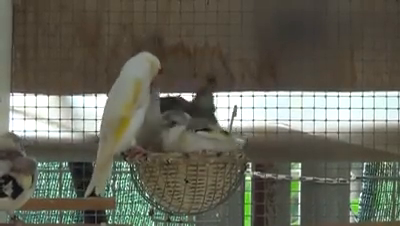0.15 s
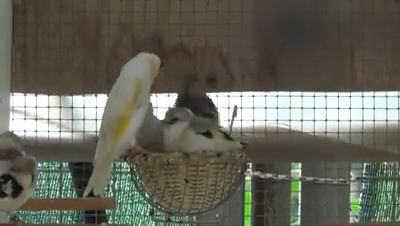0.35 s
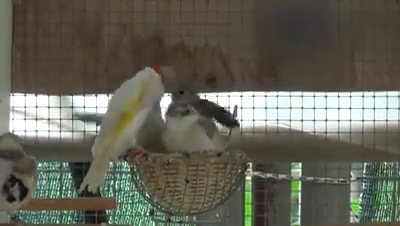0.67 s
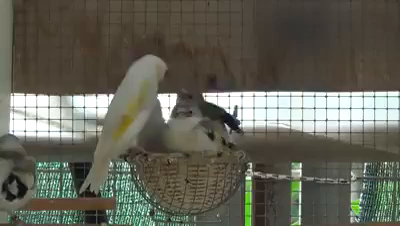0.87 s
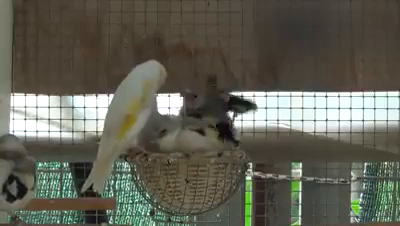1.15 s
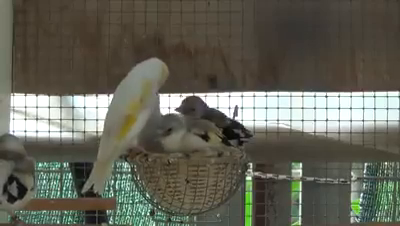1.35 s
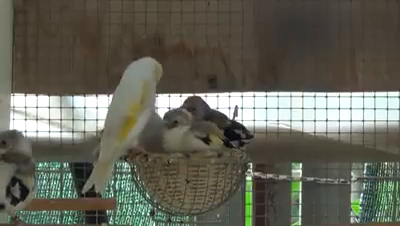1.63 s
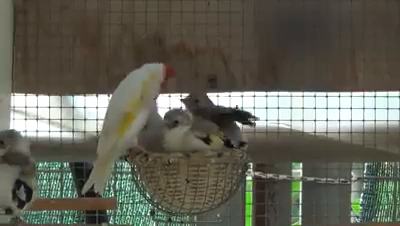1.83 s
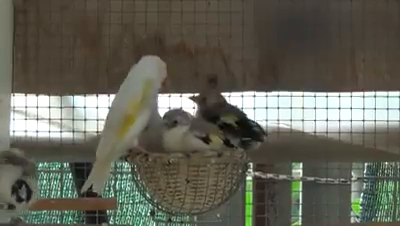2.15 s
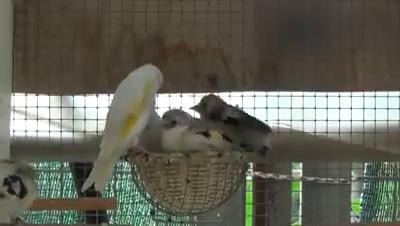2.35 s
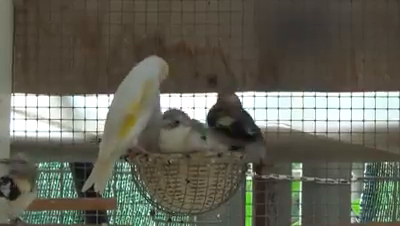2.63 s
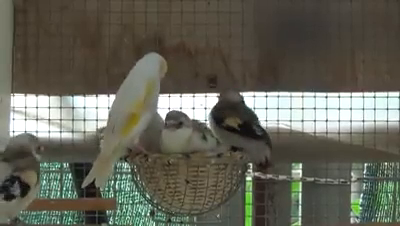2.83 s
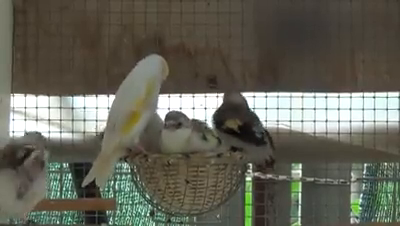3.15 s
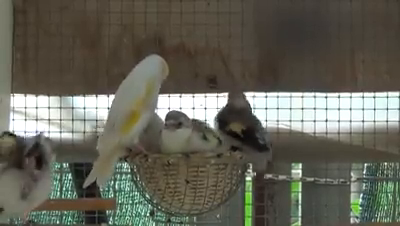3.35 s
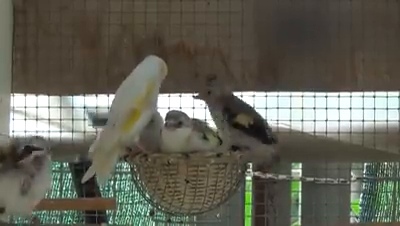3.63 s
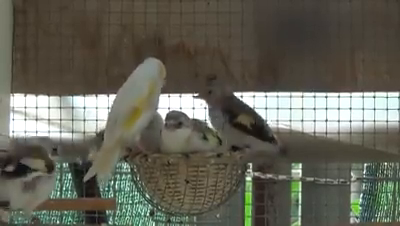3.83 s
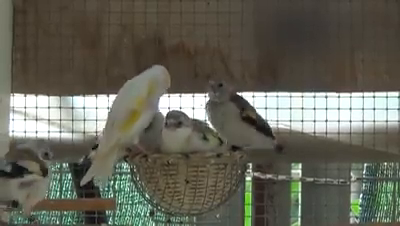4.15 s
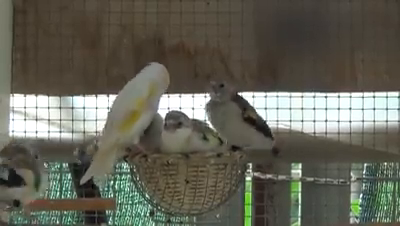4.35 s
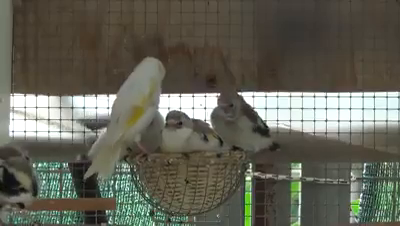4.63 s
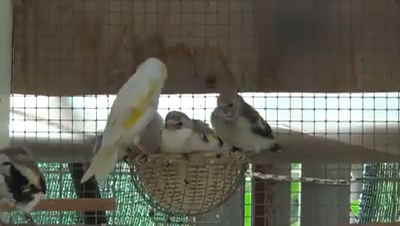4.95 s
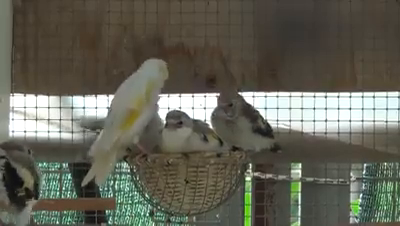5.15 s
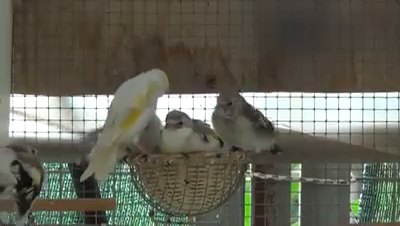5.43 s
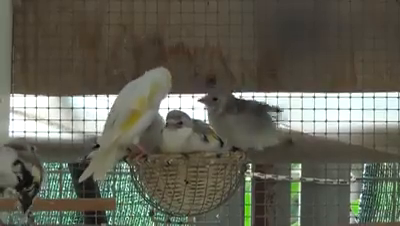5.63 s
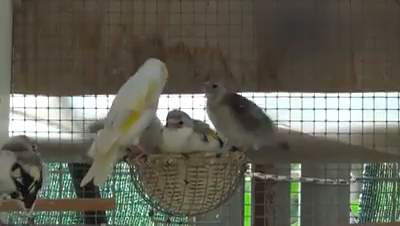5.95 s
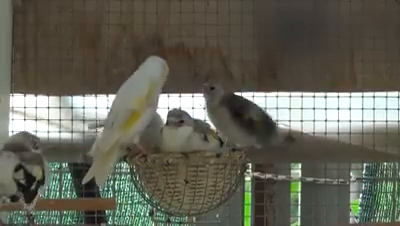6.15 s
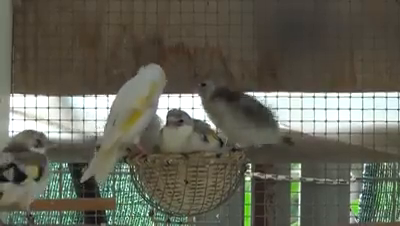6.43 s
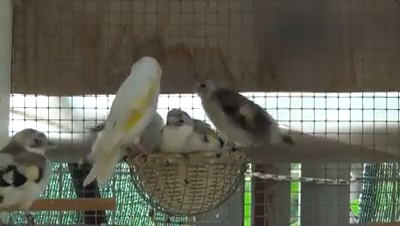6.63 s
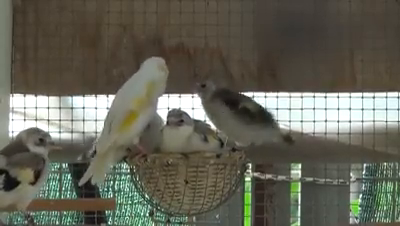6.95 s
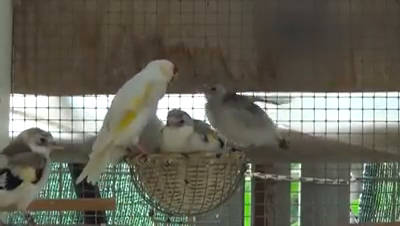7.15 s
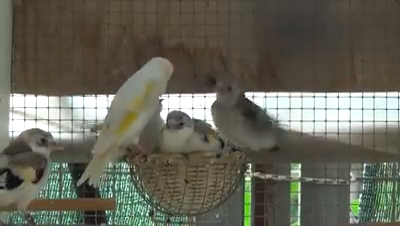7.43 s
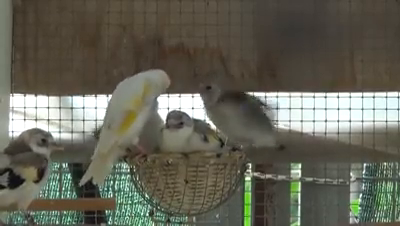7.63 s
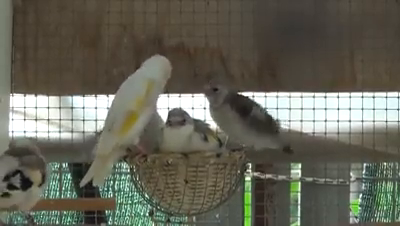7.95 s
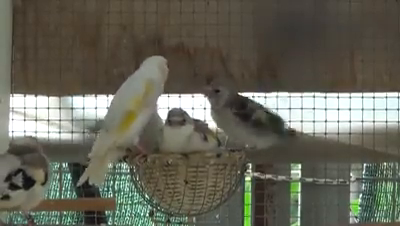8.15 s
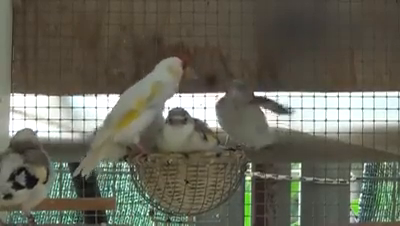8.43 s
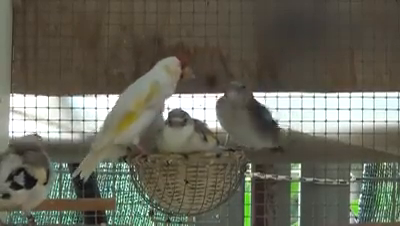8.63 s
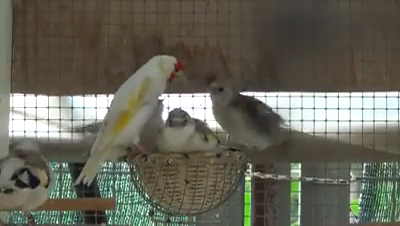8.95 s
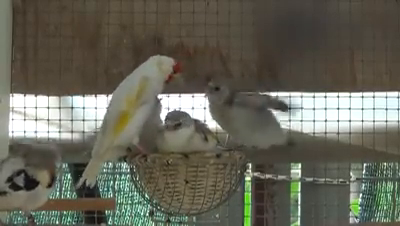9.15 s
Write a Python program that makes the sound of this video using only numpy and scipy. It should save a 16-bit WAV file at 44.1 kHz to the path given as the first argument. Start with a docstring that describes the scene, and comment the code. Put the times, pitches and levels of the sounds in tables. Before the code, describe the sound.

Close, quick finch chirps and harsh fledgling begging bursts over a hissing flock twitter, a steady mid-clip trill, dull wood knocks and faint traffic rumble.

```python
"""A wooden, wire-fronted aviary of finches, over far traffic noise and two wavering motor tones.
Close to the microphone fledglings beg with rasping rising cries and adults chirp: gliding whistles, echoed
by the boards; beak ticks are filtered cracks of noise. A trill of steady tones comes from farther off.
The rest of the flock blurs into a twitter of swelling noise bands, and dull knocks ring the wood's modes."""
import sys
import numpy as np
from scipy import signal
from scipy.fft import rfft, irfft
from scipy.io import wavfile

SR = 44100
rng = np.random.default_rng(int(sys.argv[2]) if len(sys.argv) > 2 else 0)


def output_pcm(signal):
    """Save a mono or channel-first signal as 16-bit PCM at the path in sys.argv[1].

    Samples are clipped to [-1, 1] before scaling.
    """
    pcm = np.clip(np.atleast_2d(signal).T, -1, 1) * 32767
    wavfile.write(sys.argv[1], SR, np.round(pcm).astype(np.int16))


N = 409248  # length of the scene [samples]

# difference between the two microphone ports: (frequency [Hz], side minus mid [dB])
SIDE_LEVEL = [(60, -75), (110, -70), (210, -40), (400, -42.5), (750, -22.5), (1410, -10), (2640, -9.5),
              (4960, -11), (7000, -8.5), (9330, -4)]


def from_db(db):
    """Decibels to gain."""
    return 10 ** (np.asarray(db) / 20)


def rms_one(x):
    """Scale to unit rms."""
    return x / np.sqrt(np.mean(x ** 2) + 1e-20)


def in_time(rows):
    """Columns of a table that starts with time [s], drawn as curves with one value per sample."""
    s, *columns = np.transpose(rows)
    return [np.interp(np.arange(N) / SR, s, column) for column in columns]


def wander(rate_hz):
    """Slow chance: white noise twice through a one-pole low-pass, scaled to a spread of 1."""
    r = np.exp(-2 * np.pi * rate_hz / SR)
    settled = signal.lfilter([1], [1, -2 * r, r * r], rng.standard_normal(N + SR))[SR:]
    return rms_one(settled)


def band_pass(order, edges_hz, x):
    """Keep the band between two edges [Hz]."""
    return signal.sosfilt(signal.butter(order, edges_hz, "band", fs=SR, output="sos"), x)


def coloured(x, spectrum):
    """Shape by a table of (frequency [Hz], gain [dB]), read along log frequency."""
    hz = np.maximum(np.arange(N // 2 + 1) * SR / N, 1)
    table_hz, table_db = np.transpose(spectrum)
    gain = from_db(np.interp(np.log(hz), np.log(table_hz), table_db))
    return irfft(rfft(x) * gain, N)


def spread(mid, other):
    """Two close microphone ports: an unrelated twin of the sound makes the side, stronger in the treble."""
    side = coloured(other, SIDE_LEVEL)
    return np.array([mid + side, mid - side])


def add(out, s, note, pan_db):
    """Place a note at a time [s] and between the ports, left minus right [dB]."""
    i = round(s * SR)
    note = note[:N - i]
    out[:, i:i + len(note)] += note * from_db([[pan_db / 2], [-pan_db / 2]])


def traffic():
    """Far traffic: noise coloured mostly low, its level drifting by chance."""
    # (frequency [Hz], relative level [dB])
    colour = [(12, -38), (20, 3), (43, 0), (180, -1.5), (260, 1.5), (332, -4), (958, -4.5), (1410, -6.5),
              (1880, -11), (2350, -13), (2600, -15.5), (3380, -35), (5720, -120)]
    # (time [s], level [dB])
    level = [(0.0, -38.5), (2.02, -41), (9.28, -41.5)]
    mid, other = rms_one(coloured(rng.standard_normal((2, N)), colour))
    return from_db(in_time(level)[0] + 0.69 * wander(2.5)) * spread(mid, other)


def motor_hum():
    """Two sine tones, alike at both ports, whose pitch wavers by about 1.5 Hz."""
    # (time [s], lower tone [dB], upper tone [dB])
    levels = [(0.0, -52, -51), (2.2, -49.5, -49), (2.5, -49, -65), (4.85, -51, -61), (5.1, -63, -64.5),
              (7.3, -60, -56), (7.6, -63, -47.5), (7.9, -61, -59.5), (9.28, -68, -58)]
    # (lower tone [Hz], upper tone [Hz])
    tones_hz = [65.8, 132.9]
    out = np.zeros(N)
    for hz, db in zip(tones_hz, in_time(levels)):
        phase = 2 * np.pi * np.cumsum(hz + 1.505 * wander(2.26)) / SR
        out += np.sqrt(2) * from_db(db) * np.sin(phase)
    return out


def flock():
    """So many overlapping notes, smeared by echoes, that they fuse to a hiss swelling band by band."""
    # slow ebb of the far flock: (time [s], level [dB])
    level = [(0.0, -33), (2.14, -32), (3.0, -33.5), (9.28, -33.5)]
    # (frequency [Hz], relative gain [dB])
    colour = [(1180, -57.5), (2000, -20), (2370, -12), (2610, -16), (2810, -14), (3510, -18), (4450, -5.5),
              (4720, -2.5), (5460, -8), (5950, -9), (7400, -18), (8500, -16), (11000, -53.5), (18700, -120)]
    edges_hz = np.geomspace(1800, 9200, num=10)
    out = np.zeros((2, N))
    white = rng.standard_normal((2, 2, N))
    together = wander(8.6)
    for k, band in enumerate(zip(edges_hz, edges_hz[1:])):
        swell = from_db(together + 2.12 * wander(11.0))
        # neighbouring bands take unrelated noise
        out += swell * band_pass(2, band, white[k % 2])
    mid, other = rms_one(coloured(out, colour))
    return from_db(in_time(level)[0]) * spread(mid, other)


def whistle(s, length, glide_hz, rough, stroke_hz, flutter, attack=0.21, rasp_hz=300, overtone_db=-15):
    """A syrinx glide through three pitches; quick upward strokes ride on it, roughness shakes and chops it."""
    strokes_per_s, pace_spread_db = 95, 5
    u = np.linspace(0, 1, max(round(length * SR), 8))
    shake, pulse, pace = flutter[:, round(s * SR):][:, :len(u)]
    rough = np.clip(rough, 0, 1)
    # each stroke climbs, then drops back at once
    stroke = np.cumsum(strokes_per_s * from_db(pace_spread_db * pace)) / SR % 1
    hz = np.interp(u, [0, .65, 1], glide_hz) + stroke_hz * stroke
    hz += rough * (rasp_hz + .25 * stroke_hz) * shake
    phase = 2 * np.pi * np.cumsum(hz) / SR
    # the attack is a share of the note
    breath = np.sin(np.pi / 2 * np.minimum(u / attack, 1)) * np.sqrt(np.cos(np.pi / 2 * u ** 3.6))
    # roughness also weakens the overtones
    overtones = from_db(overtone_db) * (1 - rough) ** 2 * (np.sin(2 * phase) + np.sin(3 * phase))
    return rms_one(breath * (np.sin(phase) + overtones) * (1 - rough + rough * pulse))


def falling_pairs():
    """A far bird repeats a pair of falling notes at a steady pace."""
    # (time into the pair [s], length [s], pitch at 65 % of the note [Hz], level [dB], left minus right [dB])
    pair = [(-.05, .05, 4280, -36, -2), (0.0, .047, 2690, -37, -6.5)]
    pairs, first_s, every_s = 7, -.038, .164
    rows = [(first_s + k * every_s + s, *rest) for k in range(pairs) for s, *rest in pair]
    return [row for row in rows if row[0] >= 0]


def upsweeps():
    """Clean upsweeps, from different depths through one pitch to one end, as rows for chirps()."""
    # (time [s], length [s], start [Hz], level [dB], left minus right [dB])
    sweeps = [(7.373, 0.038, 2295, -29.5, -3), (8.161, 0.032, 2463, -23.5, -1.8),
              (8.308, 0.032, 2340, -23, -3), (8.962, 0.03, 1950, -26, -1.8),
              (9.117, 0.041, 1520, -26.5, -2)]
    turn_hz, end_hz = 3197, 3470
    rough, stroke_hz, echo_db = .18, 200, -2.2  # roughness 0-1, stroke height, echo relative to the note
    return [(s, length, [start_hz, turn_hz, end_hz], db, pan_db, rough, stroke_hz, echo_db)
            for s, length, start_hz, db, pan_db in sweeps]


def chirps(flutter):
    """Adult notes: each kind of chirp has its own glide, roughness and strokes; gives (s, note, pan, echo)."""
    # by kind: (start pitch [ratio], end pitch [ratio], roughness [0-1], height of the upward strokes [Hz],
    # echo relative to the note [dB]); the ratios are to the pitch at 65 % of the note
    voices = {"falling": (1.14, .9, 0.5, 159.5, -3.5), "rasp": (0.99, 1.08, 0.26, 1251, -3),
              "whip": (.8, 1.2, .17, 751, -1), "slide": (.83, 1.05, 0.23, 260, 2.2),
              "climb": (.8, 1.2, .2, 450, 3), "peep": (1.0, 1.01, 0.24, 100, 1),
              "buzz": (1.0, 0.97, .66, 600, -0.5), "pipe": (.97, 1.8, 0.24, 38, -7.5)}
    # by kind: (time [s], length [s], pitch at 65 % of the note [Hz], level [dB], left minus right [dB])
    chirped = { "rasp": [(0.835, 0.047, 3540, -34, -4), (1.007, 0.059, 3600, -25.5, -3),
               (1.17, 0.077, 3700, -26, -2), (1.432, 0.067, 3700, -26, -3), (1.652, 0.068, 3800, -26, -2),
               (5.093, 0.031, 3700, -32.5, 1), (5.434, 0.035, 3670, -34, 2), (5.66, 0.041, 3750, -27, -3)],
               "whip": [(3.065, 0.027, 3960, -22.5, 3.7), (4.064, 0.024, 4120, -22.5, 3.5),
               (4.165, 0.028, 4050, -25.5, 3), (4.293, 0.03, 4050, -27.5, 2)],
               "pipe": [(6.905, 0.029, 1360, -43, -0.5), (6.932, 0.037, 1615, -41.5, 0),
               (8.643, 0.02, 1350, -46, 4), (8.661, 0.0225, 1680, -32, -3), (8.678, 0.014, 2000, -42, -3)],
               "slide": [(0.37, 0.027, 3280, -33, 0), (1.596, 0.058, 3370, -35.5, -4),
               (1.913, 0.056, 3260, -33.5, -3), (1.982, 0.04, 3960, -37, -4),
               (2.036, 0.031, 3270, -30.5, -1), (2.685, 0.05, 3050, -43, -5), (6.612, 0.05, 2930, -46, -4)],
               "climb": [(2.232, 0.075, 3760, -35.5, -5), (2.478, 0.095, 3760, -37.5, -2)],
               "peep": [(2.923, 0.043, 3322, -33, 5), (3.904, 0.055, 3480, -35.5, 4),
               (4.05, 0.011, 3900, -30.5, 5), (4.138, 0.018, 3920, -29, 6.2), (4.279, 0.012, 3920, -33, 3),
               (6.994, 0.034, 3400, -33.5, 1), (7.077, 0.049, 3440, -36, 6), (7.164, 0.02, 3524, -41, 1),
               (7.487, 0.019, 2720, -41, -4)], "buzz": [(1.199, 0.04, 5100, -31.5, 2),
               (1.657, 0.05, 5300, -31, 0), (3.175, 0.055, 5400, -30.5, 3), (4.509, 0.052, 5430, -33, 0),
               (4.59, 0.052, 5510, -32, -1), (4.696, 0.048, 5460, -33.5, -1),
               (4.862, 0.041, 5330, -36, 0.0), (6.621, 0.024, 5770, -39, 1), (6.89, 0.048, 5600, -36, -1.7),
               (7.146, 0.05, 5500, -36, 0), (7.351, 0.042, 5790, -35, 0.1), (8.846, 0.051, 5310, -33, 0.3),
               (8.989, 0.089, 5350, -34.5, 1)]}
    rows = []
    for kind, notes in [("falling", falling_pairs()), *chirped.items()]:
        start, end, *manner = voices[kind]
        for s, length, pitch_hz, db, pan_db in notes:
            rows.append((s, length, pitch_hz * np.array([start, 1, end]), db, pan_db, *manner))
    for s, length, glide_hz, db, pan_db, rough, stroke_hz, echo_db in rows + upsweeps():
        note = from_db(db) * whistle(s, length, glide_hz, rough, stroke_hz, flutter)
        yield s, note, pan_db, echo_db


def begging(flutter):
    """Fledglings: very rough rising cries, a short low glide just inside each; gives (s, note, pan, echo)."""
    # (time [s], length [s], start [Hz], pitch reached and held [Hz], level [dB], left minus right [dB]);
    # the strokes and the rasp ride on these pitches
    cries = [(0.854, 0.08, 5740, 7820, -22.5, -2), (1.037, 0.091, 6160, 7890, -22, -0.5),
             (2.301, 0.099, 6240, 7980, -23, 0.5), (4.733, 0.079, 6800, 7860, -22.5, -0.5),
             (5.049, 0.1, 5420, 7960, -24.5, 0), (6.226, 0.092, 6300, 7600, -24, -0.5),
             (6.964, 0.049, 5460, 8160, -25.5, 1), (7.257, 0.089, 5370, 7870, -23.5, 0),
             (7.477, .15, 5860, 7250, -27.5, 0), (8.375, 0.062, 5800, 7830, -27, -1),
             (8.55, 0.11, 6250, 7670, -24, -1)]
    under_lag_s, under_length_s, under_db = .012, .024, -13  # level relative to the cry
    echo_db = -3.0
    for s, length, start_hz, top_hz, db, pan_db in cries:
        cry = whistle(s, length, [start_hz, top_hz, top_hz], .8, 300, flutter,
                      attack=0.62, rasp_hz=602, overtone_db=-56)
        under = whistle(s, under_length_s, [2200, 2850, 3100], 0.36, 100, flutter, attack=0.37)
        yield s, from_db(db) * cry, pan_db, echo_db
        yield s + under_lag_s, from_db(db + under_db) * under, pan_db, echo_db


def beak_ticks():
    """Hard beak ticks: bursts of noise dying within milliseconds, in a band; gives (s, note, pan, echo)."""
    # (time [s])
    times = [3.205, 2.5, 4.078]
    # (lower edge [Hz], upper edge [Hz])
    band_hz = [3730, 6570]
    peak_db = -15.5
    decay = np.exp(-np.arange(round(.01 * SR)) / SR / 0.00045)
    cracks = band_pass(2, band_hz, rng.standard_normal((len(times), len(decay))) * decay)
    for s, crack in zip(times, cracks):
        yield s, from_db(peak_db) * crack / np.abs(crack).max(), 0, 0


def near_birds():
    """Chirps, begging and ticks close by: the direct sound and what feeds the echoes."""
    direct, echo = np.zeros((2, 2, N))
    flutter = np.array([wander(255), wander(510), wander(60)])  # shake, pulse, pace of the strokes
    for s, note, pan_db, echo_db in [*chirps(flutter), *begging(flutter), *beak_ticks()]:
        add(direct, s, note, pan_db)
        add(echo, s, from_db(echo_db) * note, pan_db)
    return direct, echo


def aviary(x):
    """Dense early echoes off boards and roof stop when the far wall has answered; a faint tail follows."""
    t60_s, far_wall_s, tail_db = 0.33, 0.042, -6.5
    t = np.arange(round(t60_s * SR)) / SR
    early = 1 / (1 + np.exp((t - far_wall_s) / 0.0022))
    shape = (early + from_db(tail_db)) * from_db(-60 * t / t60_s) * (t > .004)
    shared, own = rng.standard_normal((2, len(t))) * shape / np.sqrt(np.sum(shape ** 2))
    wet = signal.fftconvolve(x, [shared], axes=1)[:, :N]
    wide = signal.fftconvolve(x.mean(axis=0), own)[:N]
    # the wide part enters the two ports with opposite sign
    return wet + from_db(2.0) * coloured(wide, SIDE_LEVEL) * [[1], [-1]]


def knocks():
    """A soft, drawn-out contact drives the wood's modes, most those near the place struck."""
    # (time, 8 ms after the onset [s], relative level [dB], centre of the modes struck [Hz])
    blows = [(2.113, -38.5, 220), (4.427, -40, 177.5), (4.849, -34.5, 178), (5.016, -38.5, 258),
             (6.275, -24, 159), (6.372, -35.5, 169), (7.72, -36, 243), (7.909, -32.5, 275),
             (8.145, -31, 252), (8.289, -37, 407), (8.439, -31, 250)]
    # modes of the wood: (frequency [Hz], relative level [dB], time to fall 60 dB [s])
    modes = [(149, 1.5, 0.16), (189, 5.5, 0.18), (259, 4, 0.12), (282.6, 1, 0.22), (344, -2, .1),
             (400.7, 1, 0.24), (475, 2, 0.22), (570, -2, 0.057), (640, -10, .1)]
    out = np.zeros(N)
    t = np.arange(round(0.064 * SR)) / SR
    contact = np.exp(-t / 0.052) * np.minimum(t * 100, 1)
    pushes = rng.standard_normal((len(blows), len(t))) * contact
    for hz, mode_db, t60 in modes:
        force = np.zeros(N)
        for (s, db, centre_hz), push in zip(blows, pushes):
            i = round((s - .008) * SR)
            # 6.4 dB weaker for each octave from the centre
            force[i:i + len(t)] += push * from_db(db + mode_db - 32.0 - 6.4 * abs(np.log2(hz / centre_hz)))
        r = from_db(-60 / (t60 * SR))
        w = 2 * np.pi * hz / SR
        out += signal.lfilter([.5, 0, -.5], [1, -2 * r * np.cos(w), r * r], force + 1e-18)
    return band_pass(3, [115, 680], out)


def trill():
    """Smooth notes on fixed tones, from far enough that one wall answers each note."""
    # (time, 8 ms after the onset [s], level [dB])
    notes = [(2.7464, -30), (2.837, -33.5), (2.936, -28.5), (3.039, -28), (3.1334, -28), (3.2277, -26),
             (3.3238, -28), (3.424, -29), (3.521, -28), (3.6187, -27.5), (3.7213, -28.5), (3.8288, -28.5),
             (3.9273, -28.5)]
    # (frequency [Hz], level relative to the note [dB])
    tones = [(2688, -2), (6132, -13), (7504, -21)]
    note_s, pan_db, echo_s, echo_db = 0.031, -15.5, .029, -9.5
    out = np.zeros((2, N))
    t = np.arange(round(note_s * SR)) / SR
    swell = np.sin(np.pi * (t / note_s) ** 1.2)
    phases = rng.uniform(0, 2 * np.pi, (len(notes), len(tones)))
    for (s, db), phase in zip(notes, phases):
        chord = sum(from_db(v) * np.sin(2 * np.pi * hz * t + p) for (hz, v), p in zip(tones, phase))
        note = from_db(db) * chord * swell
        add(out, s - .008, note, pan_db)
        add(out, s - .008 + echo_s, from_db(echo_db) * note, pan_db)
    return out


def scene():
    """All sources; the near birds also sound through the aviary's echoes."""
    far = traffic() + motor_hum() + flock()
    birds, echo = near_birds()
    return far + birds + aviary(echo) + knocks() + trill()


def record(dry):
    """The difference between left and right is high-passed, so the bass is centred; two steep low-passes
    in a row close the top."""
    first_hz, second_hz = 8620, 9900  # pass-band edge of the first, stop-band edge of the second
    mid, side = (dry[0] + dry[1]) / 2, (dry[0] - dry[1]) / 2
    side = signal.sosfilt(signal.butter(6, 330, "high", fs=SR, output="sos"), side)
    first = signal.ellip(8, .3, 38, first_hz, fs=SR, output="sos")
    second = signal.cheby2(8, 45, second_hz, fs=SR, output="sos")
    return signal.sosfilt(np.vstack([first, second]), [mid + side, mid - side])


dry = scene()
out = record(dry)
output_pcm(out)
```